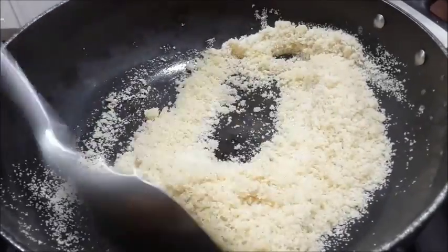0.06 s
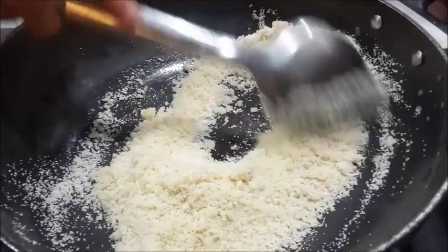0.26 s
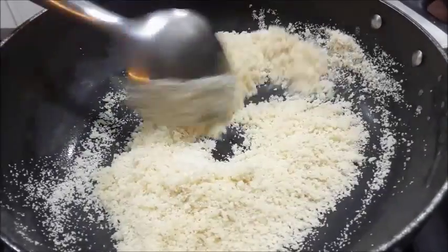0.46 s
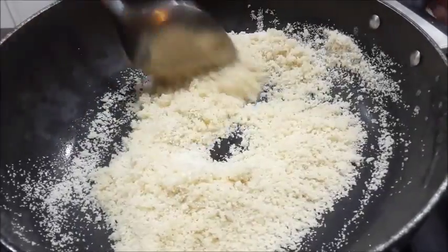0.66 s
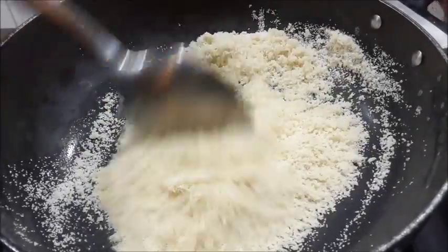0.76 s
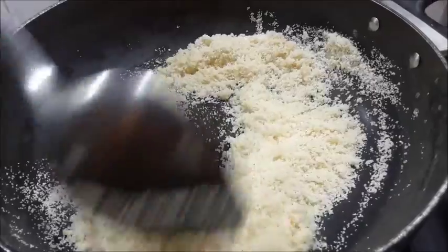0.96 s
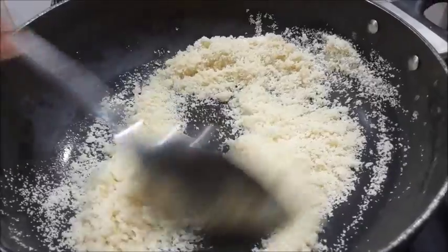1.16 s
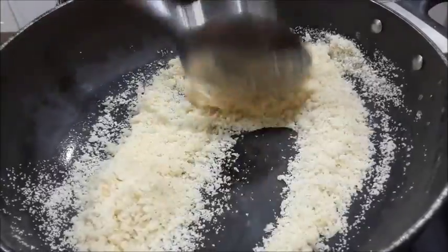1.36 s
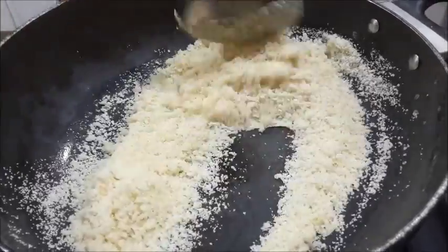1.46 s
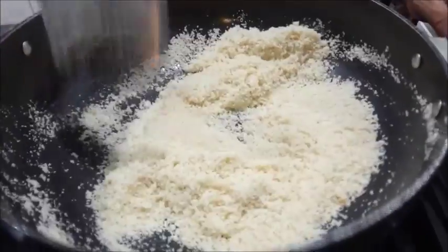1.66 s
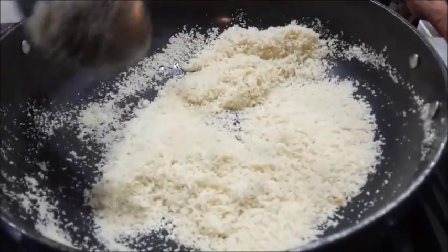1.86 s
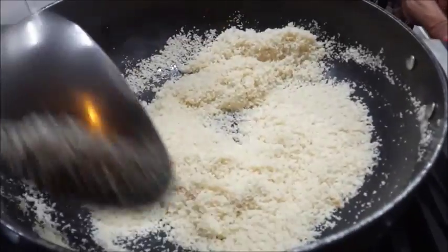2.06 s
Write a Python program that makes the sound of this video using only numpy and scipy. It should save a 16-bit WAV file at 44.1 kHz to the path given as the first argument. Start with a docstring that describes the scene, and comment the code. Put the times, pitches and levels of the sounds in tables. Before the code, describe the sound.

Close up in a small kitchen, a spatula pushes dry crumbly grains in a pan: a crisp crackly scrape, two shorter ones, a pause, then bright clanky taps on the right over a very quiet low hum.

```python
"""Gritty scrapes in three strokes, a soft hiss, then knocks and chatter far to the right over a low drone.
A spatula pushes dry grains round a non-stick pan, close up, and ends against the pan wall in a small kitchen.
Scrapes are crowds of tiny random slips and knocks are short bursts, each played through a contact response:
a pulse, a crack, the pan's ringing modes and the room. The hiss is fine random grains; the drone is
coloured noise."""
import sys
import numpy as np
from scipy import signal
from scipy.fft import rfft, irfft
from scipy.io import wavfile
from scipy.ndimage import uniform_filter1d

SR = 44100
rng = np.random.default_rng(int(sys.argv[2]) if len(sys.argv) > 2 else 0)


def put_to_file(sound):
    """Save the sound as 16-bit audio at rate SR, in the file named by the first command-line argument."""
    columns = np.atleast_2d(sound).T  # one column per channel
    safe = np.clip(columns, -1, 1)
    whole_steps = np.round(safe * 32767)
    wavfile.write(sys.argv[1], SR, whole_steps.astype(np.int16))


N = 92610  # length in samples

# Pushes of the blade. Each row: start in seconds, rise in seconds, length in seconds, grit level in dB,
# pan body level in dB, rasp level in dB, hollow level in dB, hollow pitch in Hz, brightest grit in Hz.
BLADE_PUSHES = [(0.191, 0.008, 0.034, -34, -47.5, -44, -43.5, 278, 8300),
                (0.225, 0.0083, 0.057, -29.5, -47.5, -42, -44.5, 500, 8100),
                (0.3135, 0.00089, 0.011, -22.5, -48, -31.5, -39, 546, 6900),
                (0.33, 0.0069, 0.04, -19, -39, -34, -35.5, 620, 9000),
                (0.393, 0.0018, 0.013, -17, -36.5, -44.5, -32.5, 694, 8200),
                (0.45, 0.0017, 0.016, -16.5, -32, -30, -39, 815, 7400),
                (0.47, 0.0026, 0.039, -20.5, -40, -38.5, -47, 900, 7900),
                (.757, 0.02, .022, -23.5, -51, -47, -81, 400, 8400),
                (0.783, 0.0046, 0.044, -25.5, -44, -34, -43.5, 202, 8600),
                (0.821, 0.023, 0.052, -21, -47.5, -51, -32, 1690, 9200),
                (1.1994, 0.00068, .008, -28, -58, -56, -46.5, 338, 8200),
                (1.248, 0.024, 0.052, -26.5, -76, -43, -49.5, 560, 8700),
                (1.277, 0.018, 0.072, -31, -55, -45.5, -52, 2800, 8800)]
PUSH_GRIT, PUSH_BODY, PUSH_RASP, PUSH_HOLLOW = 3, 4, 5, 6  # column numbers

# The blade lands or cracks a grain. Each row: start in seconds, click level in dB, knock level in dB,
# thud level in dB, rasp level in dB.
BLADE_KNOCKS = [(.196, -36.5, -38, -47, -34.5), (.279, -36, -58, -39, -50), (.324, -18, -51, -54, -24),
                (.347, -19, -68, -67, -40), (.394, -23, -37, -41.5, -47), (.402, -31, -32.5, -51, -27),
                (.452, -25, -26, -53, -34), (.485, -20, -57, -79, -44), (.507, -29, -90, -72, -26),
                (.774, -23.5, -30, -24.5, -26), (.846, -37, -34.5, -76, -22), (.861, -32, -41, -73, -28),
                (.879, -22.5, -42.5, -86, -37), (1.18, -27, -43, -46, -27), (1.205, -30, -51, -81, -54)]
KNOCK_CLICK, KNOCK_BODY, KNOCK_THUD, KNOCK_RASP = 1, 2, 3, 4  # column numbers

# Taps on the pan wall. Each row: start in seconds, click level in dB, clank level in dB.
WALL_TAPS = [(1.645, -26, -27.5), (1.673, -38, -54), (1.682, -25, -31.5), (1.708, -31, -46.5),
             (1.754, -44.5, -47), (1.805, -16, -24), (1.838, -26.5, -44), (1.871, -32, -35.5),
             (1.909, -31, -43.5), (1.935, -40, -40.5), (1.951, -40, -40)]
TAP_CLICK, TAP_CLANK = 1, 2  # column numbers

# The blade drags on the wall. Each row: start in seconds, rise in seconds, length in seconds,
# grit level in dB, pan body level in dB.
WALL_DRAGS = [(1.624, 0.001, 0.049, -34, -38.5), (1.808, .003, 0.029, -38, -42),
              (1.84, 0.0044, 0.091, -49.5, -50)]
DRAG_GRIT, DRAG_BODY = 3, 4  # column numbers

# Hiss of the stirred grains. Each row: time in seconds, level in dB.
HISS_LEVEL = [(0, -47.5), (.09, -56), (.19, -52.5), (.3, -41.5), (.52, -39.5), (.6, -49), (0.721, -51),
              (0.781, -35.5), (.93, -44), (1.0, -56.5), (1.17, -53.5), (1.24, -41.5), (1.431, -44.5),
              (1.48, -60.5), (1.611, -56.5), (1.64, -66)]
# Level of the low drone. Each row: time in seconds, level in dB.
DRONE_LEVEL = [(0, -62.5), (.45, -64.5), (.65, -58.5), (1.1, -65), (1.55, -68.5), (1.8, -64), (2.1, -75)]

# Tone colours of the contacts, the hiss and the drone. Each row: frequency in Hz, relative level in dB.
GRIT_COLOUR = [(200, -77), (1500, -27.5), (3000, -32), (4200, -29), (5200, -28), (6200, -4), (7300, -0.5),
               (8200, 2), (9300, 0), (10500, -6), (12000, -12.5), (14500, -26)]
RASP_COLOUR = [(200, -44), (600, -25), (1000, -36), (2000, -26), (2500, -16), (3000, -11.5), (3500, -2.5),
               (4200, -6), (5000, 0.5), (6200, -1.5), (7500, -0.5), (14000, -20.5)]
BODY_COLOUR = [(60, -30), (270, -45), (450, -8), (700, -3), (1100, 4), (1400, -1.5), (1700, -3), (2300, -1),
               (3500, -9), (6000, -11)]
THUD_COLOUR = [(40, -43.5), (90, -29), (150, -4.5), (300, -7), (550, 2.5), (820, 4.5), (1150, 0),
               (1600, -13.5), (3000, -36), (8000, -88)]
CLICK_COLOUR = [(2000, -26), (4600, -22.5), (5500, -2.5), (6300, -11), (7200, -3.5), (7900, 2.5),
                (9000, -1), (10000, -13.5), (12000, -14), (14500, -47)]
CLANK_COLOUR = [(40, -26), (100, -10.5), (170, -12.5), (380, -5), (560, -12), (800, -8.5), (1150, -9.5),
                (1400, -9), (1750, -3.5), (2450, 2.5), (2900, -6.5), (3400, -3), (4600, -8.5),
                (8000, -44.5)]
SIZZLE_COLOUR = [(60, -23), (300, -12), (700, -14), (1000, -28), (1500, -33), (2000, -21.5), (2800, -21),
                 (4000, -13), (6000, -8.5), (8000, 3.5), (9500, -4), (11500, -11.5), (14500, -18)]
DRONE_COLOUR = [(25, -25), (60, -17), (110, -11), (145, -8), (178, 8.5), (215, -7.5), (280, 5.5),
                (400, -5.5), (800, -10), (2000, -15), (8000, -32)]

# Ringing of the pan. Each row: frequency in Hz, level before colouring in dB, 60 dB decay time in seconds.
PAN_MODES = [(145.3, -4, 0.43), (371, -7, 0.21), (811, -11.5, 0.22), (1684, 2, 0.39), (2420, 3.5, 0.22),
             (2540, 0, 0.21), (2762, 10, 0.21), (3380, 3.5, 0.26), (5700, -4.5, 0.52), (5860, -6.5, 0.23),
             (7170, 4, 0.092), (7742, -2, 0.085), (7730, 0, 0.12), (9400, 2, .1)]

# Stereo balance of the stirring and of the wall. Each row: frequency in Hz, left minus right in dB.
STIRRING_BALANCE = [(200, 5), (700, 4), (1500, 0.5), (2400, -10), (3500, -0.5), (5000, 0), (6500, 5),
                    (7400, 7.5), (8200, -5), (9300, -15), (11500, -1.5), (14000, -7.5)]
WALL_BALANCE = [(100, -17), (1000, -26.5), (2500, -30), (5500, -20.5), (8000, -65), (12000, -31)]

RELEASE_S, SLIPS_PER_S = 0.0021, 2200  # let-go time constant, average slip rate
KNOCK_CHATTER_S, TAP_CHATTER_S = 0.00064, 0.0022  # time constants
HOLLOW_Q = 1.46
BLADE_Q, BLADE_SHARE = 3.6, 0.56  # sharpness of the treble band, its share of the mix (0 to 1)
ROOM_T60_S, WIDE_HZ = 0.4, 2200  # room decay, pitch from which the modes' left and right phases are unrelated
LEFT_FADES_S, LEFT_FADE_DB_PER_S = 1.56, 79
TOP_HZ = 14700


def stirring():
    """The blade lands and grinds over grains: slips and knocks excite five contact responses."""
    judder = undb(1.3 * walk(350))  # 1.3 dB rms of unsteady pressure
    slips = grains(SLIPS_PER_S, scatter_db=6.5) * judder
    crumbs = spread(4000, scatter_db=5, shared=.45) * judder

    grit = response(GRIT_COLOUR, crack_t60=0.0052, direct_db=-4, ring_db=-12, room_db=-8.5)
    rasp = response(RASP_COLOUR, crack_t60=0.037, direct_db=-7, ring_db=-18.5, room_db=-2)
    body = response(BODY_COLOUR, crack_t60=0.021, direct_db=-2, ring_db=-11.5, room_db=-5)
    thud = response(THUD_COLOUR, crack_t60=0.044, direct_db=4.5, ring_db=-12.5, room_db=-1)
    bowl_colour = [(100, -2.1), (2000, -4.8), (15000, 0.98)]  # Hz, dB
    bowl = response(bowl_colour, crack_t60=0.072, direct_db=2.5, ring_db=-35, room_db=-2.5)

    grit_force = squeeze(crumbs) + blows(BLADE_KNOCKS, KNOCK_CLICK, KNOCK_CHATTER_S)
    body_force = grind(BLADE_PUSHES, PUSH_BODY, slips) + blows(BLADE_KNOCKS, KNOCK_BODY)
    rasp_force = grind(BLADE_PUSHES, PUSH_RASP, crumbs) + blows(BLADE_KNOCKS, KNOCK_RASP, KNOCK_CHATTER_S)
    thud_force = blows(BLADE_KNOCKS, KNOCK_THUD)

    mix = sound(grit_force, grit) + sound(body_force, body) + sound(rasp_force, rasp)
    mix = mix + sound(thud_force, thud) + sound(hollow(slips), bowl)
    return place(mix, STIRRING_BALANCE)


def squeeze(crumbs):
    """The blade favours a different treble band in each push, with its angle and pressure."""
    force = 0
    for push in BLADE_PUSHES:
        b, a = signal.iirpeak(push[-1], BLADE_Q, fs=SR)
        favoured = signal.lfilter(b, a, crumbs)
        mixed = BLADE_SHARE * favoured + (1 - BLADE_SHARE) * crumbs
        force = force + grind([push], PUSH_GRIT, mixed)
    return force


def hollow(slips):
    """The air under the blade resonates, at a pitch set for each push."""
    force = 0
    for push in BLADE_PUSHES:
        b, a = signal.iirpeak(push[-2], HOLLOW_Q, fs=SR)
        once = signal.lfilter(b, a, slips)
        twice = signal.lfilter(b, a, once)  # a second pass steepens the skirts
        force = force + grind([push], PUSH_HOLLOW, unit(twice))
    return force


def tapping():
    """The spatula knocks, drags and bounces on the pan wall: a bright click over a clank."""
    slips = grains(1800, scatter_db=3)
    click = response(CLICK_COLOUR, crack_t60=0.034, direct_db=-0.5, ring_db=-16, room_db=-6.5)
    clank = response(CLANK_COLOUR, crack_t60=0.03, direct_db=-1.5, ring_db=-21, room_db=-0.5)
    treble = grind(WALL_DRAGS, DRAG_GRIT, slips) + blows(WALL_TAPS, TAP_CLICK, TAP_CHATTER_S)
    middle = grind(WALL_DRAGS, DRAG_BODY, slips) + blows(WALL_TAPS, TAP_CLANK, TAP_CHATTER_S)
    return place(sound(treble, click) + sound(middle, clank), WALL_BALANCE)


def hiss():
    """Fine grains slide and sizzle as a dense crowd of tiny impacts that swells with each stroke."""
    t = np.arange(N) / SR
    level = undb(np.interp(t, *np.array(HISS_LEVEL).T) + 0.67 * walk(38.54))
    fine_grains = spread(7000, scatter_db=3, shared=.3)
    sizzle = response(SIZZLE_COLOUR, crack_t60=0.01, direct_db=4.5, ring_db=-12, room_db=-7.5)
    balance = [(1000, 3), (6500, 1.5), (9300, -7), (13000, -1.5)]  # Hz, left minus right dB
    return place(sound(level * fine_grains, sizzle), balance)


def kitchen():
    """A low drone of coloured noise that fades at the end, sooner on the left."""
    t = np.arange(N) / SR
    left_db = -LEFT_FADE_DB_PER_S * np.maximum(t - LEFT_FADES_S, 0)
    level_db = np.interp(t, *np.array(DRONE_LEVEL).T) + np.array([left_db, 0 * t])
    return unit(colour(air(), DRONE_COLOUR)) * undb(level_db)


def grind(rows, column, slips):
    """Each push builds up, holds and lets go; its force is a crowd of tiny slips."""
    t = np.arange(N) / SR
    envelope = 0
    for row in rows:
        start, rise, length = row[:3]
        build_up = np.clip((t - start) / rise, 0, 1)
        let_go = np.exp(-np.maximum(t - start - length, 0) / RELEASE_S)
        envelope = envelope + undb(row[column]) * build_up * let_go
    return slips * envelope


def blows(rows, column, chatter_s=0):
    """Each blow is a pulse with a brief chatter of its own; its level is the rms over 4 ms."""
    force, t = np.zeros(N), np.arange(512) / SR
    decay = np.exp(-t / max(chatter_s, 1e-7))  # without chatter, a single sample
    shapes = rng.standard_normal((len(rows), len(t))) * decay
    for row, shape in zip(rows, shapes):
        start = int(row[0] * SR)
        strength = undb(row[column]) * np.sqrt(.004 * SR)
        force[start:start + len(t)] += strength * shape / np.linalg.norm(shape)
    return force


def grains(rate, scatter_db):
    """Random tiny impacts of uneven size and either sign, at an average rate per second, rms 1."""
    hits = rng.random(N) < rate / SR
    signs = rng.choice([-1, 1], N)
    sizes = undb(scatter_db * np.clip(rng.standard_normal(N), -2, 2))
    return unit(hits * signs * sizes)


def spread(rate, scatter_db, shared):
    """Grains across the width of the pan: a shared part reaches both sides, the rest only one."""
    both = grains(rate, scatter_db)
    own = np.array([grains(rate, scatter_db) for _ in range(2)])
    return np.sqrt(shared) * both + np.sqrt(1 - shared) * own


def response(spectrum, crack_t60, direct_db, ring_db, room_db):
    """What one contact sounds like: a pulse, a short crack, the pan's modes and the room."""
    t = np.arange(N) / SR

    def fade(t60):
        """Exponential decay by 60 dB in t60 seconds."""
        return undb(-60 * t / t60)

    ring = 0
    for hz, db, t60 in PAN_MODES:
        phase = rng.random((2, 1)) * min(hz / WIDE_HZ, 1)  # in cycles, wider apart at higher pitch
        ring = ring + undb(db) * fade(t60) * np.sin(2 * np.pi * (hz * t + phase))
    crack = unit(air() * fade(crack_t60))
    pulse = undb(direct_db) * unit(1. * (t == 0))
    room = undb(room_db) * unit(air() * fade(ROOM_T60_S))
    contact = unit(colour(crack + pulse + room, spectrum))
    contact = contact + undb(ring_db) * unit(colour(ring, spectrum))
    return unit(contact) / np.sqrt(N)  # unit energy per channel on average


def sound(force, contact):
    """Play a contact force through a response."""
    return signal.fftconvolve(np.atleast_2d(force), contact, axes=1)[:, :N]


def place(x, balance):
    """Share each frequency between left and right, keeping the summed power gain."""
    hz, db = np.array(balance, float).T
    right = 10 * np.log10(2 / (1 + undb(db) ** 2))
    return np.array([colour(x[0], np.c_[hz, right + db]), colour(x[1], np.c_[hz, right])])


def colour(x, points):
    """Causal minimum-phase filter through (Hz, dB) points, built by folding the cepstrum."""
    size = 2 * N
    hz, db = np.array(points, float).T
    bins_hz = np.arange(N + 1) * SR / size
    gain = undb(np.interp(np.log(bins_hz + 1), np.log(hz), db))
    cepstrum = irfft(np.log(gain))
    cepstrum[1:N] *= 2
    cepstrum[N + 1:] = 0
    return irfft(rfft(x, size) * np.exp(rfft(cepstrum)))[..., :N]


def air():
    """Stereo noise, more alike in the low mids and close to unrelated in the treble."""
    mid, side = rng.standard_normal((2, N))
    side = colour(side, [(60, -3), (600, -8), (WIDE_HZ, -2), (6000, 0)])
    return unit(np.array([mid + side, mid - side]))


def walk(rate):
    """Smoothed random steps at a rate per second, rms 1."""
    k = max(int(SR / rate), 2)
    steps = np.repeat(rng.uniform(-1, 1, N // k + 1), k)
    return unit(uniform_filter1d(steps, k)[:N])


def undb(db):
    """Decibels to gain."""
    return 10 ** (np.asarray(db) / 20)


def unit(x):
    """Scale to rms 1."""
    return x / np.sqrt(np.mean(x ** 2))


def scene():
    """Stirring, wall taps, hiss and kitchen drone together."""
    return stirring() + tapping() + hiss() + kitchen()


def record(dry):
    """Round the highest peaks softly and cut the top with a steep low-pass."""
    ceiling = 0.49
    rounded = ceiling * np.tanh(dry / ceiling)
    low_pass = signal.ellip(10, .2, 75, TOP_HZ, fs=SR, output="sos")  # order, ripple dB, stopband dB
    return signal.sosfilt(low_pass, rounded)


dry = scene()
out = record(dry)
put_to_file(out)
```